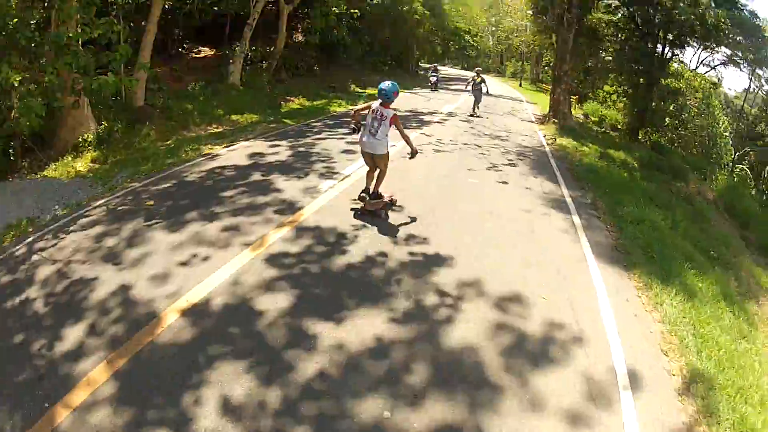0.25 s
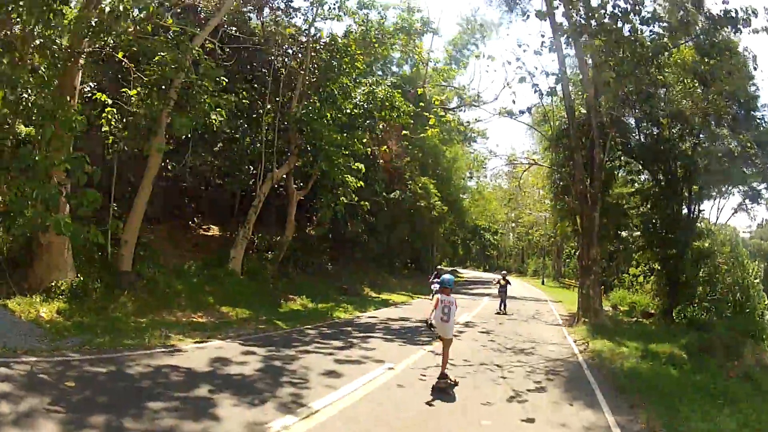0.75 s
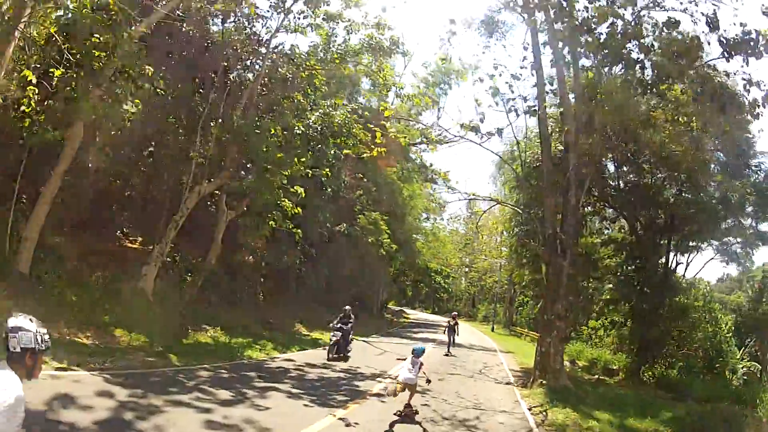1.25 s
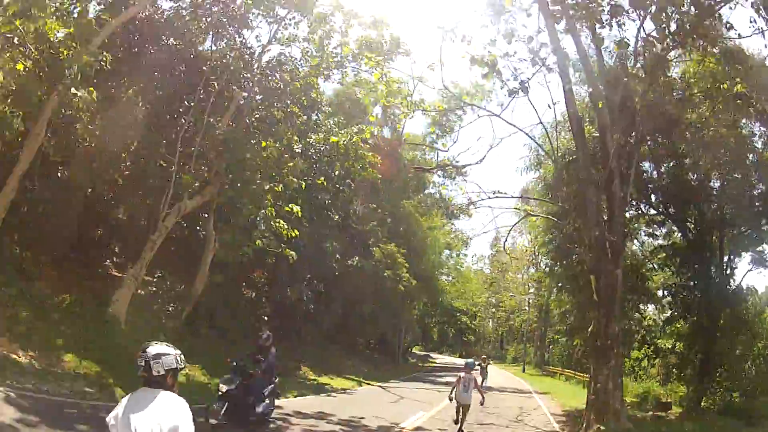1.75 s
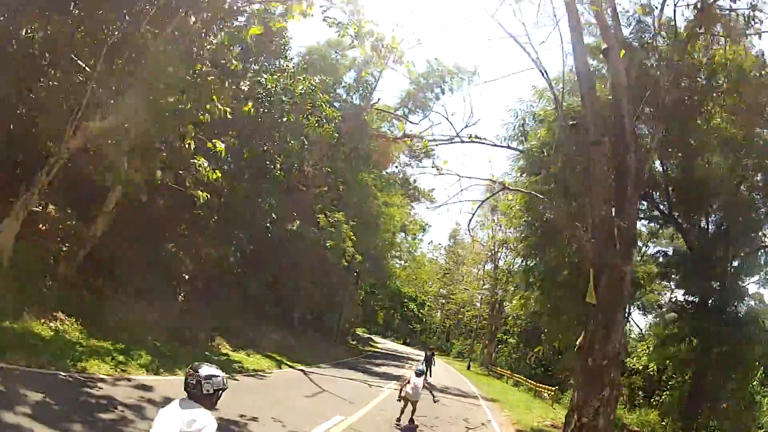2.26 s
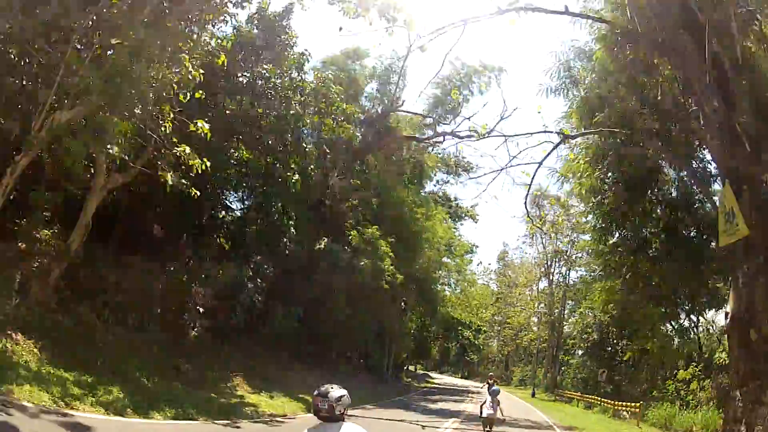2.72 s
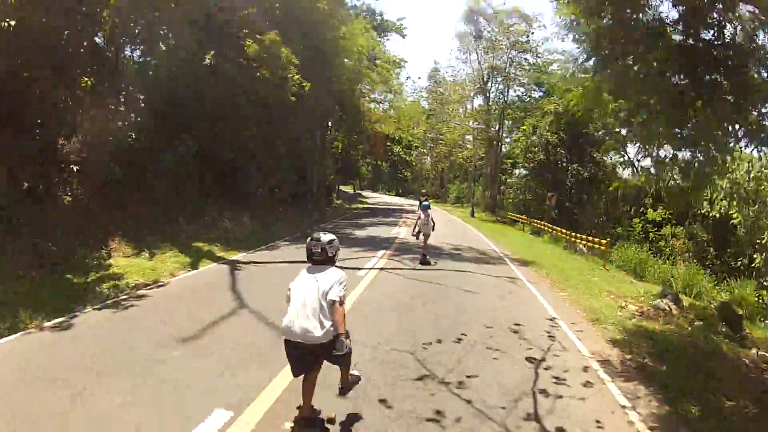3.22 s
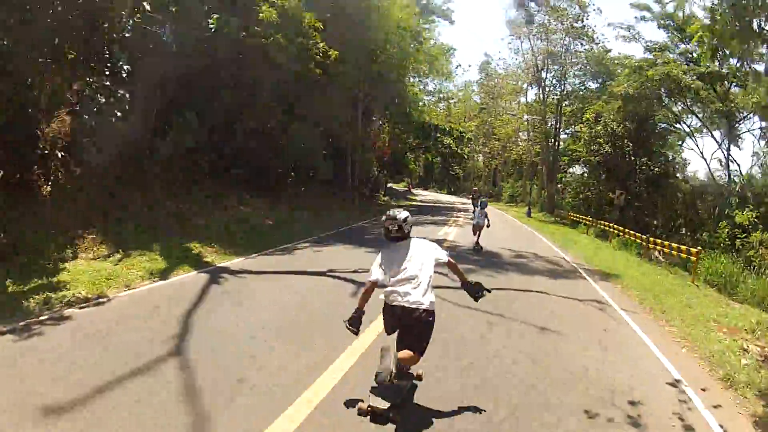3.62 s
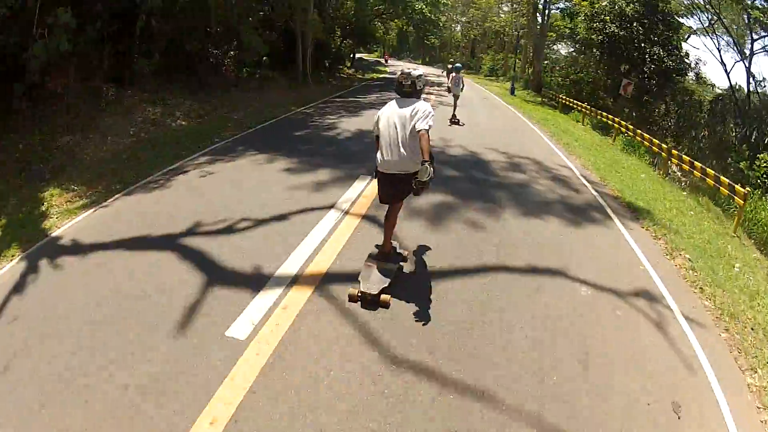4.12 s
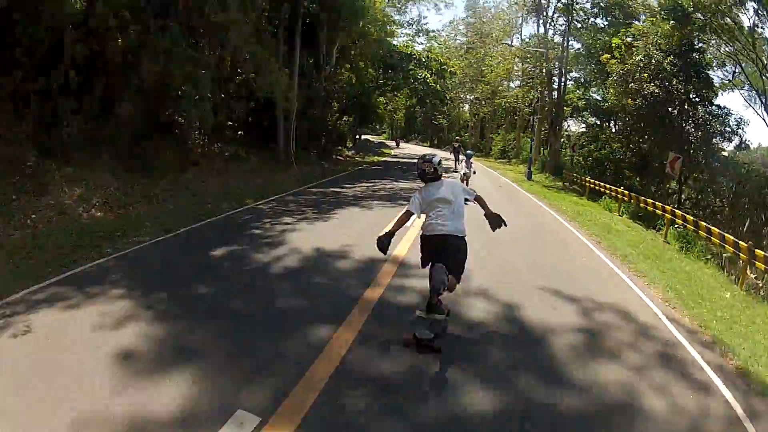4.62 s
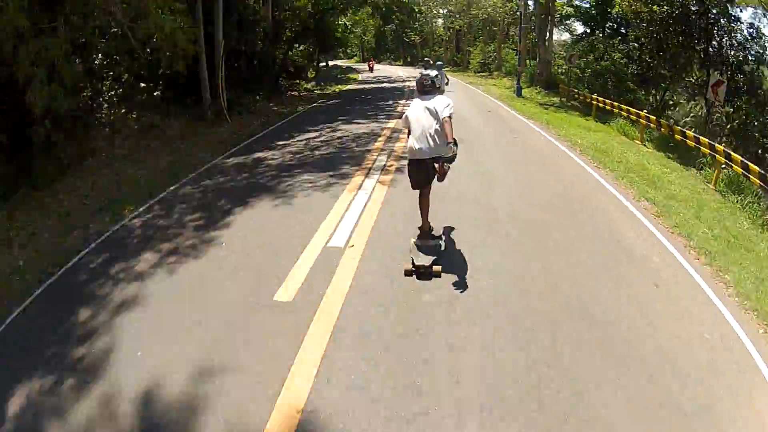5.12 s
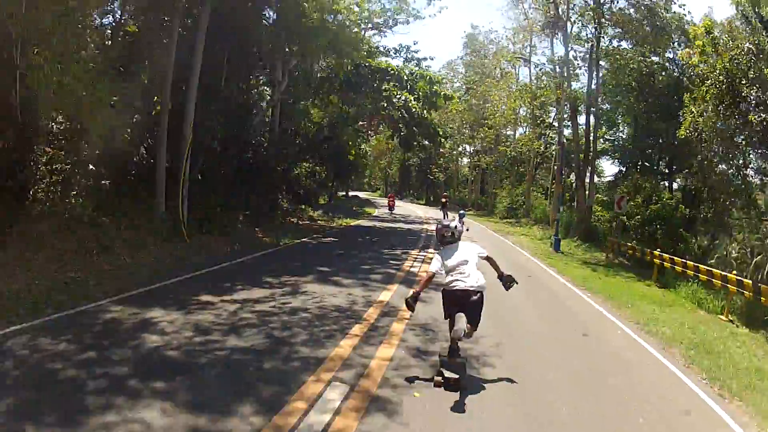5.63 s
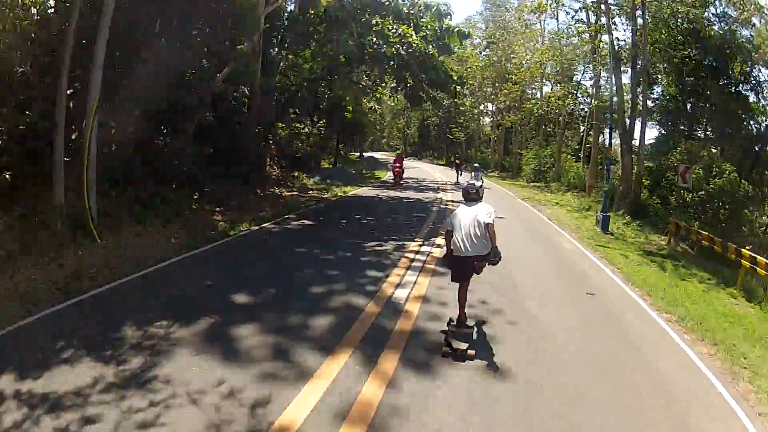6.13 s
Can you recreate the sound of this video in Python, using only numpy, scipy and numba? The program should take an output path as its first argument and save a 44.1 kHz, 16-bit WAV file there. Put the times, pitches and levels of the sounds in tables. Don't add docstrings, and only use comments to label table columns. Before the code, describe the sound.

Outdoors on a tree-lined downhill road, a helmet camera sealed in a plastic case hears longboard wheels hissing and wind thumping. The case knocks and a buckle ticks throughout. A hard slam comes early, a scooter's tyres swell and drop away with a brief rubber squeak, then rolling and wind strengthen. Two much harder slams overload the microphone, and a small engine throbs at the end.

```python
import sys
import numpy as np
from scipy import signal
from scipy.fft import rfft, irfft
from scipy.io import wavfile
from scipy.ndimage import uniform_filter1d
from numba import njit

SR = 44100
rng = np.random.default_rng(int(sys.argv[2]) if len(sys.argv) > 2 else 0)


def invert_db(x):
    u = np.asarray(x, float) / 20
    return 10 ** u


def master_out(mix):
    frames = np.transpose(np.atleast_2d(mix))
    ceiling = np.clip(frames, -1, 1)
    pcm = np.round(ceiling * 32767).astype(np.int16)
    wavfile.write(sys.argv[1], SR, pcm)


N = 280917
T = np.arange(N) / SR

# (time [s], rolling level [dB])
ROLLING = [(0.0, -56.5), (0.26, -59.5), (0.94, -58.5), (1.13, -55), (1.72, -54), (2.3, -54.5), (3.1, -51),
           (3.83, -50), (4.1, -55.5), (4.5, -50), (4.91, -50), (5.14, -55.5), (5.5, -48), (5.98, -48.5),
           (6.37, -48.5)]
# (frequency [Hz], width [Hz], level [dB])
CASE_MODES = [(1726, 224, -1), (1900, 196, 1), (2106, 193, -1.5), (2310, 64, 2), (2464, 178, -4),
              (2820, 120, -18.5)]
# (frequency [Hz], width [Hz], level [dB])
DECK_MODES = [(600, 65, -8), (805, 230, -16.5), (1110, 60, -2.5), (1210, 69, 0.5), (1316, 206, -6.5)]
# (frequency [Hz], width [Hz], level [dB])
GRIT_MODES = [(3160, 1080, 39), (5040, 13000, 8.5)]
# (time [s], length [s])
GRIT_GAPS = [
    (1.733, .035),
    (5.134, .068),
    (5.666, .035),
]
GRIT_GAP_DB = -12
ROLL_MID_DB, DECK_DB, DECK_SLOPE, GRIT_DB, GRIT_SLOPE = -53, -57, 1.29, -63.5, 0.39
TYRES_S, TYRES_DB, TYRES_GRIT_DB = 2.724, -49, -6
NEARING_DB_S, LEAVING_DB_S, ABREAST_S = 37, 76, 0.46

# (time [s], buffet level [dB])
WIND = [(0.0, -63), (0.07, -54.5), (0.3, -61), (0.9, -58.5), (1.28, -51), (1.9, -54), (2.32, -48),
        (2.6, -49.5), (2.98, -53), (3.3, -51.5), (3.68, -47), (3.97, -50), (4.3, -47.5), (4.67, -48.5),
        (5.3, -48), (5.55, -43), (5.92, -49), (6.37, -47)]
# (frequency [Hz], width [Hz], level [dB])
BUFFET_MODES = [(124.5, 56, 1.5), (237.5, 107, -1.5), (460, 218, -8.5)]
# (frequency [Hz], width [Hz], level [dB])
RUMBLE_MODES = [(26, 24, -10.5), (63.7, 15.6, 0)]
# (time [s], peak level [dB], fall on both sides [dB/s])
GUSTS = [(0.74, -44, 60), (0.99, -48, 150), (1.65, -37, 48), (2.0, -48.5, 60), (2.32, -41.5, 40),
         (2.75, -41, 38), (3.25, -39.5, 51), (3.64, -42.5, 66), (3.93, -40.5, 58), (4.212, -36, 100),
         (4.66, -29, 155), (5.05, -35.5, 80), (5.391, -18, 300), (5.55, -22, 350), (6.139, -45, 42),
         (6.37, -42, 250)]
WIND_MID_DB, RUMBLE_DB, RUMBLE_SLOPE = -50, -50, 0.1

# (time [s], peak level [dB], direction [+1 or -1], lower mode [dB], thud [dB])
SLAMS = [
    (1.7229, 12.5, -1, -10.5, -10.5),
    (5.126, 21.5, 1, 1, -5.5),
    (5.6553, 20, 1, -6, -10),
]
# (frequency [Hz], level [dB], 60 dB decay time [s])
SLAM_RINGS = [(186, -16, 0.026), (800, -44, 0.013), (1266, -10, 0.016), (1600, -16, 0.02),
              (2370, -10.5, 0.016), (3040, -24.5, 0.012), (3240, -21, 0.014), (4070, -28, 0.0035),
              (5435, -4.5, 0.0044), (5620, -30.5, 0.0041)]

# (time [s], peak level [dB], leading mode [Hz], crack [dB])
TAPS = [(0.0098, -38, 2170, -33), (0.0334, -35, 2220, -32), (0.083, -39, 1840, -17), (0.501, -31, 1920, -4),
        (0.594, -31.5, 2380, -5), (0.7163, -32, 2130, -7), (0.962, -39, 1920, -9),
        (1.0915, -38.5, 1920, -18), (1.1202, -22, 2270, 1), (1.213, -32, 1900, -7),
        (1.4528, -30, 1890, -2.5), (2.0999, -35, 2350, -10), (2.3869, -23.5, 2200, 1.5),
        (2.4128, -26.5, 2370, -5.5), (3.3912, -21.5, 2270, -6), (3.6633, -36, 1950, -8),
        (3.8594, -36.5, 2310, -27), (4.314, -35, 2300, -9), (4.394, -19.5, 2310, -35),
        (4.5244, -35.5, 1690, -19), (4.781, -29.5, 2020, -9), (5.103, -25, 1900, -25),
        (5.111, -31, 2300, -8), (5.117, -34, 2300, -3), (5.12, -25, 1480, 0), (0.0658, -37.5, 2320, -30),
        (0.7356, -37, 1790, -12), (5.4834, -28.5, 2410, -5)]
TAP_THUD_DB, TAP_MS = -21.5, 3
# (time [s], peak level [dB], leading mode [Hz], thud [dB])
BUMPS = [(1.3129, -27.5, 1225, -11), (1.5543, -28, 1240, -1.5), (3.1825, -26, 1240, -4.5),
         (3.5725, -37, 1150, -12), (3.6103, -26, 1730, 7), (4.141, -34.5, 1233, 6.5),
         (4.6194, -33, 1250, -7), (4.7, -34.5, 1180, -5), (5.0474, -32.5, 1160, 3.5),
         (5.1072, -11.5, 1740, -5), (5.3772, -23, 1210, 1.5), (5.4101, -29.5, 1240, 3.5)]
BUMP_CRACK_DB, BUMP_MS = -27, 1.9
BUMP_RINGS_DB = -4.5
# (time [s], peak level [dB], leading mode [Hz], crack [dB])
CLACKS = [
    (0.5307, -28, 1920, -6.5),
    (1.6538, -19, 1790, -6),
    (3.4379, -29, 2110, 6),
    (4.458, -30.5, 2310, 0),
    (5.0705, -34, 2370, -5),
]
CLACK_THUD_DB, CLACK_MS = -4, 3.3
# (frequency [Hz], level [dB], 60 dB decay time [s])
KNOCK_RINGS = [(1160, -52, 0.22), (1730, -46, 0.044), (1920, 0, 0.02), (2300, 3.5, 0.017),
               (2530, -17, 0.074)]

# (time [s], peak level [dB], length [ms])
TICKS = [(0.1141, -33, 2.3), (0.235, -47, 7.6), (0.2613, -43, 1.5), (0.6828, -43, 1.6), (0.696, -37, 2.2),
         (0.8648, -37, 0.54), (0.8737, -39, 2.5), (0.919, -45.5, 3.4), (1.1282, -30, 3), (1.5804, -34.5, 6),
         (1.694, -28.5, 0.8), (1.838, -45, 3.3), (2.5496, -34.5, 2.2), (2.6219, -34, 1.7),
         (2.6494, -37, 1.8), (3.168, -40, 4.4), (3.698, -36.5, 1.5), (3.713, -32, 3.9), (4.6354, -38, 1.9),
         (4.6477, -37, 1.8), (4.6543, -31, 4.3), (4.83, -38.5, 4.3), (5.2031, -43.5, 4.3), (5.215, -49, 4),
         (5.387, -21.5, 1.03), (5.4949, -37, 6.1), (5.5797, -35.5, 7.8), (5.63, -30.5, 6),
         (5.7045, -31.5, 4.2), (5.798, -29, 3.4)]
FAINT_TICKS = [0.1254, 0.183, 0.2109, 0.3027, 0.3155, 0.4454, 0.6135, 0.8804, 0.9244, 3.9569, 4.009, 4.6284,
               4.6624, 5.3338, 6.1085]
FAINT_DB, FAINT_MS = -49.5, 4.7
# (frequency [Hz], width [Hz], level [dB])
BUCKLE_MODES = [(3000, 2600, -2), (3665, 500, 6), (4750, 2700, -5), (5036, 480, 6)]

# (time [s], peak level [dB], frequency [Hz], 60 dB decay time [s])
JOLTS = [(0.534, -30, 73, 0.095), (0.715, -33.5, 42, 0.26), (1.31, -38.5, 72, 0.28), (1.721, -19, 62, 0.15),
         (2.735, -30, 47.4, 0.077), (4.569, -32.5, 42, 0.075), (4.641, -26, 63, 0.17),
         (5.112, -16, 75.3, 0.18), (5.131, -16.5, 67, 0.26), (5.364, -26, 58.3, 0.33),
         (5.385, -27.5, 61.4, 0.38), (5.665, -9.5, 62, 0.085), (5.734, -27, 61, 0.23)]
# (time [s], peak level [dB], frequency [Hz], 60 dB decay time [s])
LINGER = [
    (1.722, -40, 1297, 0.28),
    (5.128, -40, 1080, 0.31),
    (5.658, -31.5, 1316, 0.27),
]

# (time [s], slip rate [Hz], level [dB], unsteadiness [0-1])
SQUEAK = [
    (2.712, 432, -90, 0),
    (2.719, 432, -46, 0),
    (2.75, 434, -48, .1),
    (2.765, 440, -52, .8),
    (2.83, 448, -55, 1),
    (2.88, 456, -61, 1),
    (3.0, 464, -65, 1),
    (3.15, 468, -80, 1),
]
# (multiple of slip rate [-], steady level [dB], unsteady level [dB])
SQUEAK_ORDERS = [(6, 0, -9), (7, -12, 0), (8, -9, -5), (9, -4, -11), (10, -10, -28)]

# (time [s], pitch [Hz], level [dB])
PASSING = [
    (2.0, 600, -85),
    (2.1, 572, -57.5),
    (2.2, 590, -71),
    (2.32, 600, -74),
    (2.5, 550, -64),
    (2.68, 580, -80),
]
# (multiple of pitch [-], level [dB])
PASSING_ORDERS = [(3, -5), (4, 7.5), (5, -26), (6, -5), (7, -8)]

# (time [s], level [dB])
AHEAD = [
    (0.0, -58.5),
    (0.4, -65.5),
    (0.6, -52),
    (0.85, -58),
    (1.07, -69),
    (1.4, -60.5),
]
# (frequency [Hz], width [Hz], level [dB])
AHEAD_MODES = [(526, 87, 10), (575, 97, -7)]

# (time [s], level [dB])
ENGINE = [
    (5.74, -48),
    (5.808, -46.5),
    (6.274, -43),
    (6.37, -40),
]
# (frequency [Hz], width [Hz], level [dB])
EXHAUST_MODES = [(71, 40, -4), (144, 37, 1), (207, 36, 5.5), (420, 50, -4)]
ENGINE_HZ = 37.05

HOLD_HZ, CHIP_HZ = 12000, 48000


def curves(table):
    s, *columns = np.transpose(table)
    return [np.interp(T, s, column) for column in columns]


def together(*db):
    return 10 * np.log10(sum(invert_db(d) ** 2 for d in db))


def unit(x):
    return x / np.sqrt(np.mean(x ** 2) + 1e-18)


def band(x, hz, width):
    return signal.lfilter(*signal.iirpeak(hz, hz / width, SR), x)


def body(x, modes):
    return sum((-1) ** k * invert_db(db) * band(x, hz, width) for k, (hz, width, db) in enumerate(modes))


def walk(rate):
    k = int(SR / rate)
    steps = np.repeat(rng.standard_normal(N // k + 1), k)
    return 1.77 * uniform_filter1d(uniform_filter1d(steps, k), k)[:N]


def wobbly(hz, spread):
    return 2 * np.pi * np.cumsum(hz * (1 + spread * walk(400))) / SR


def ring(hz, t60, size):
    t = np.arange(size) / SR
    return np.sin(2 * np.pi * hz * t) * np.exp(-np.log(1000) * t / t60)


def burst(noise, ms):
    t = np.arange(len(noise)) / SR * 1000
    attack = np.minimum(t / 0.37, 1)
    return noise * attack * np.exp(-np.maximum(t - ms, 0) / (0.6 * ms))


def add(out, s, x, db):
    i = int(s * SR)
    out[i:i + len(x)] += (x * invert_db(db) / np.abs(x).max())[:N - i]


def flow(modes, db, flicker_db, rate, grain_db):
    grains = invert_db(grain_db * np.repeat(rng.exponential(size=N // 64 + 1), 64)[:N])
    source = rng.standard_normal(N) * grains
    total = 0
    for k, mode in enumerate(modes):
        flicker = invert_db(flicker_db * walk(rate))
        total = total + (-1) ** k * flicker * body(source, [mode])
    return invert_db(db) * unit(total)


def wheels():
    roll_db = curves(ROLLING)[0]
    nearing_db = NEARING_DB_S * np.maximum(TYRES_S - ABREAST_S - T, 0)
    leaving_db = LEAVING_DB_S * np.maximum(T - TYRES_S, 0)
    tyres_db = TYRES_DB - nearing_db - leaving_db
    deck_db = DECK_DB + DECK_SLOPE * (roll_db - ROLL_MID_DB)
    own_grit_db = GRIT_DB + GRIT_SLOPE * (roll_db - ROLL_MID_DB)
    grit_db = together(own_grit_db, tyres_db + TYRES_GRIT_DB)
    grit_db += GRIT_GAP_DB * sum((T > s) & (T < s + length) for s, length in GRIT_GAPS)
    shake_db = 0.9 * walk(14)
    case_db = together(roll_db, tyres_db)
    case = flow(CASE_MODES, case_db + shake_db, flicker_db=1.3, rate=16, grain_db=1.2)
    deck = flow(DECK_MODES, deck_db + shake_db, flicker_db=1.5, rate=14, grain_db=1.2)
    grit = flow(GRIT_MODES, grit_db + shake_db, flicker_db=1.2, rate=30, grain_db=1.2)
    return case + deck + grit


def wind():
    buffet_db = curves(WIND)[0]
    steady_db = RUMBLE_DB + RUMBLE_SLOPE * (buffet_db - WIND_MID_DB)
    gusts_db = [db - fall * abs(T - s) for s, db, fall in GUSTS]
    rumble_db = together(steady_db, *gusts_db)
    buffet = flow(BUFFET_MODES, buffet_db, flicker_db=2.2, rate=18, grain_db=1.5)
    rumble = flow(RUMBLE_MODES, rumble_db - 5, flicker_db=2.5, rate=3.972, grain_db=0.5)
    return buffet + rumble


def slams():
    out, size = np.zeros(N), 8000
    for s, db, sign, lower_db, thud_db in SLAMS:
        shell = ring(1985, 0.014, size)
        shell += invert_db(lower_db) * ring(1115, 0.015, size)
        shell += invert_db(thud_db) * ring(252, 0.023, size)
        shell += sum(invert_db(d) * ring(hz, t60, size) for hz, d, t60 in SLAM_RINGS)
        add(out, s, sign * shell, db)
        add(out, s + 0.0016, sign * shell, db - 19.0)
        latch = band(burst(rng.standard_normal(size), 2.4), 1130, 1940)
        add(out, s, latch, db - 17.0)
    return out


def knocks():
    out, size = np.zeros(N), 5000
    hits = [(s, db, hz, crack_db, TAP_THUD_DB, TAP_MS, 0) for s, db, hz, crack_db in TAPS]
    hits += [(s, db, hz, BUMP_CRACK_DB, thud_db, BUMP_MS, BUMP_RINGS_DB) for s, db, hz, thud_db in BUMPS]
    hits += [(s, db, hz, crack_db, CLACK_THUD_DB, CLACK_MS, 0) for s, db, hz, crack_db in CLACKS]
    for s, db, hz, crack_db, thud_db, ms, rings_db in hits:
        contact = burst(rng.standard_normal(size), ms)
        contact[8] += 5.0
        shell = ring(hz, 0.02, size)
        shell += sum(invert_db(d + rings_db) * ring(f, t60, size) for f, d, t60 in KNOCK_RINGS)
        thud = ring(247, 0.047, size) + 0.22 * ring(446, 0.034, size)
        add(out, s, signal.fftconvolve(contact, shell)[:size], db)
        add(out, s, body(contact, GRIT_MODES), db + crack_db + 0.5)
        add(out, s, thud, db + thud_db - 2.5)
    return out


def ticks():
    out = np.zeros(N)
    for s, db, ms in TICKS + [(s, FAINT_DB, FAINT_MS) for s in FAINT_TICKS]:
        contact = burst(rng.standard_normal(2000), ms)
        add(out, s, body(contact, BUCKLE_MODES), db + 1)
    return out


def jolts():
    out = np.zeros(N)
    for s, db, hz, t60 in JOLTS + LINGER:
        add(out, s, ring(hz, t60, size=20000), db)
    return out


def squeak():
    hz, db, loose = curves(SQUEAK)
    out = 0
    for share, detune in ((1, 1), (0.7 * loose, 1.02)):
        phase = wobbly(hz * detune, 0.003 + 0.012 * loose)
        for k, steady_db, unsteady_db in SQUEAK_ORDERS:
            partial_db = steady_db + (unsteady_db - steady_db) * loose + 2 * walk(50)
            out = out + share * invert_db(partial_db) * np.sin(k * phase)
    return invert_db(db + 3) * out * (T > SQUEAK[0][0])


def passing():
    hz, db = curves(PASSING)
    phase = wobbly(hz, 0.012)
    return invert_db(db) * sum(invert_db(d + 4.2 * walk(18)) * np.sin(k * phase) for k, d in PASSING_ORDERS)


def board_ahead():
    gone_db = 90 * (T > AHEAD[-1][0])
    return flow(AHEAD_MODES, curves(AHEAD)[0] - 1.5 - gone_db, flicker_db=1.5, rate=12, grain_db=1.1)


def engine():
    count = int(N / SR * ENGINE_HZ)
    late, strength = rng.standard_normal((2, count))
    at = (np.arange(count) + 0.28 + 0.006 * late) / ENGINE_HZ
    pulses = np.zeros(N)
    pulses[np.clip((at * SR).astype(int), 0, N - 1)] = invert_db(1.5 * strength)
    s, db = np.transpose(ENGINE)
    level_db = np.interp(T, s, db - 2.5, left=-150)
    return unit(body(pulses, EXHAUST_MODES)) * invert_db(level_db)


def scene():
    rolling = wheels() + wind()
    case = slams() + knocks() + ticks() + jolts()
    others = squeak() + passing() + board_ahead() + engine()
    return (rolling + case + others)[None]


@njit
def follow(x, attack, release):
    e, out = 0., np.empty(len(x))
    for i in range(len(x)):
        e += (abs(x[i]) - e) * (attack if abs(x[i]) > e else release)
        out[i] = e
    return out


def hold_samples(x):
    x = x * (1 + 2 * np.cos(2 * np.pi * HOLD_HZ * T))
    hz = np.fft.rfftfreq(N, 1 / SR)
    delay = 1 / HOLD_HZ - 1 / CHIP_HZ
    hold = np.sinc(hz / HOLD_HZ) / np.sinc(hz / CHIP_HZ) * np.exp(-1j * np.pi * hz * delay)
    return irfft(rfft(x) * hold, N)


def low_pass(x):
    return signal.sosfilt(signal.butter(12, 16240, fs=SR, output="sos"), x)


def record(dry):
    peak = follow(dry[0], 0.0026, 0.00067)
    duck = np.maximum(peak / invert_db(-22.0), 1) ** 0.59
    x = dry[0] / duck * invert_db(2.0)
    x = np.clip(x, -0.95, 0.95)
    x = signal.sosfilt(signal.butter(8, 5700, fs=SR, output="sos"), x)
    x = hold_samples(x)
    x = signal.sosfilt(signal.ellip(6, 0.5, 35, 15300, fs=SR, output="sos"), x)
    x = np.clip(x, -1, 1)
    return low_pass(x[None])


dry = scene()
out = record(dry)
master_out(out)
```